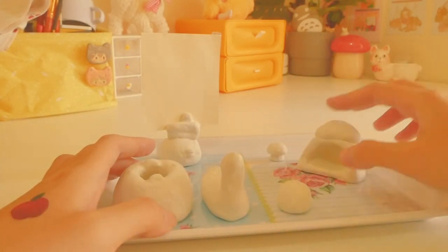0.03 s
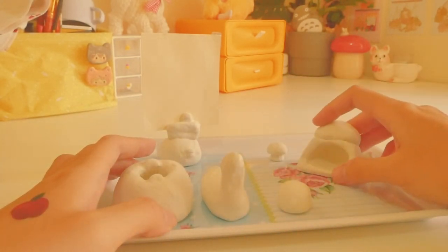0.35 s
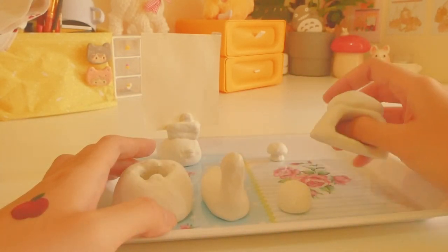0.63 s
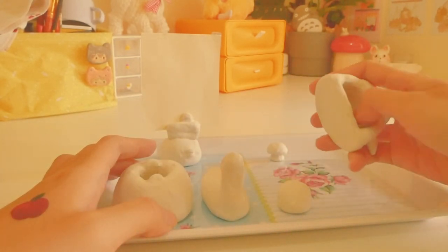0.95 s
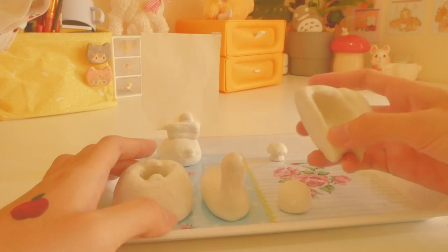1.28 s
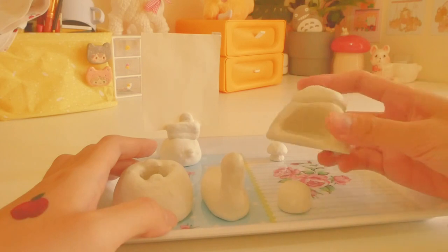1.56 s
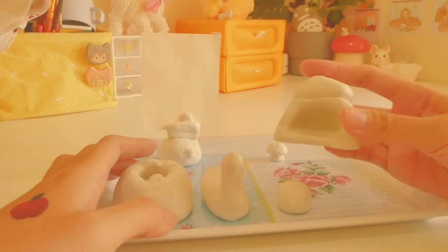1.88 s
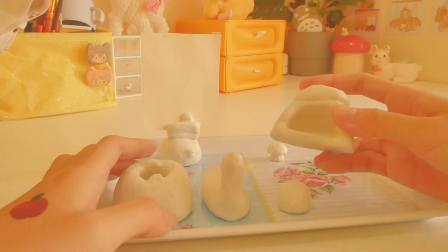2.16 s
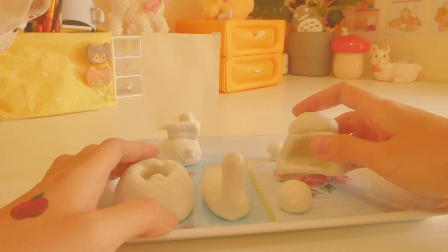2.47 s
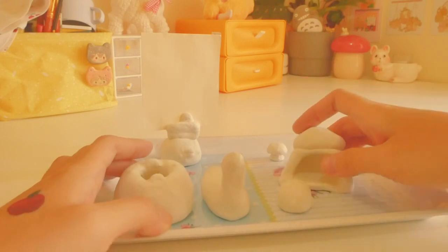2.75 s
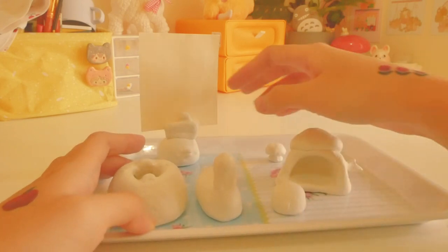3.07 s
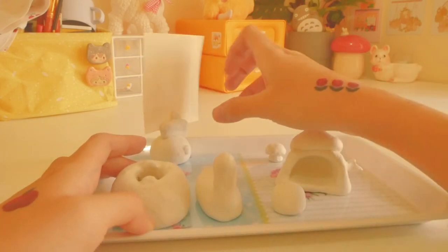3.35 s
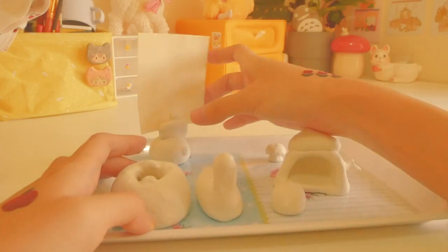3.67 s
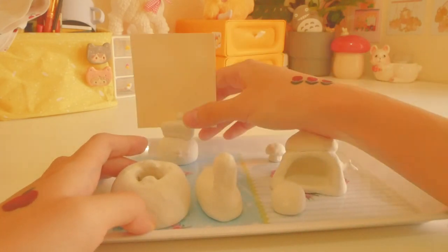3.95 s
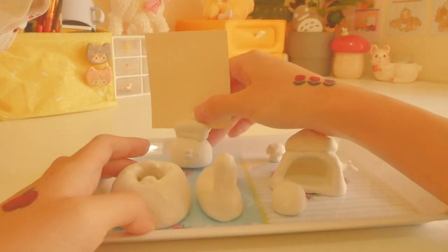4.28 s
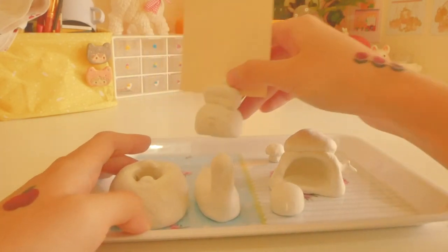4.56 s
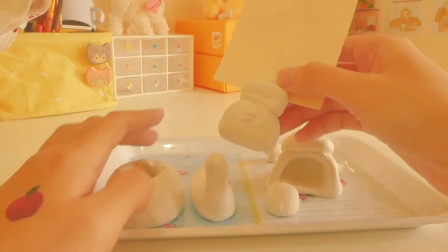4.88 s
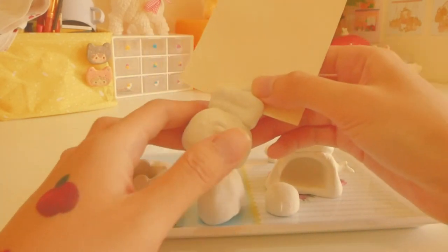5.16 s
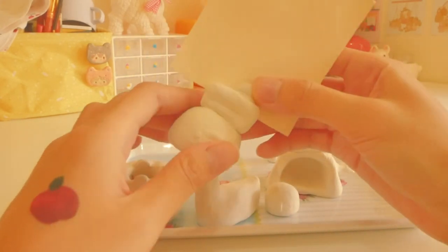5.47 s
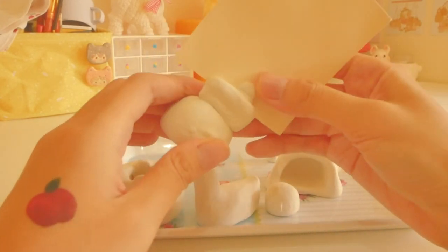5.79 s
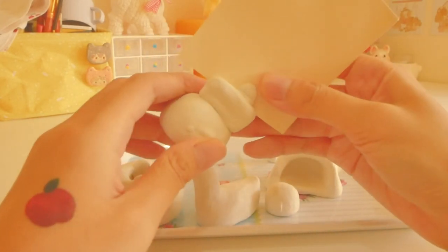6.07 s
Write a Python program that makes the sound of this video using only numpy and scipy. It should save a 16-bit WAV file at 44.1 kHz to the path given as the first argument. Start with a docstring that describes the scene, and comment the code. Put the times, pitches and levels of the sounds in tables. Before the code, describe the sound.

Small clay figures are handled close by on a plastic tray in a quiet, slightly reverberant room. Soft bumps and a light knock come in the first half second, followed by very faint finger rubbing. At 2.7 and 2.8 seconds a figure is set down with two hollow, dry clacks. From 3.4 seconds another is bumped and rocks in a quick run of taps, with the loudest knock near 3.9. Light ticks follow, and the tray groans faintly under dragging clay around 3.8 and 4.4. A paper card rustles softly, with occasional faint hisses of sliding skin. Several sharp clacks fall between 5.1 and 5.4 seconds, then fingers rub clay and paper until about 6.3. Underneath, a low room hush rises slightly, and a thin, faint electric whirr appears at the start, from 4 to 5 seconds and at the very end.

```python
"""On a desk in a quiet room, small clay figures are picked up, set down and bumped on a plastic tray.
Each impact excites damped modes of tray and desk, a hollow thump, while the chattering contact radiates
a dry clack and a bright snap. A bumped figure rocks from edge to edge; a dragged one makes the tray groan.
Fingers rub clay and a paper card with stick-slip friction; faint narrow hisses and squeaks pass now and
then. The room reverberates briefly, over an on-and-off electric whirr and a low, slowly rising hush."""
import sys
import numpy as np
from scipy import signal
from scipy.fft import rfft, irfft, next_fast_len
from scipy.io import wavfile
from scipy.ndimage import map_coordinates

SR = 44100
rng = np.random.default_rng(int(sys.argv[2]) if len(sys.argv) > 2 else 0)


def unload_audio(sound):
    """Save the sound as a 16-bit wav file, at the path given as the first command line argument."""
    columns = np.transpose(np.atleast_2d(sound))
    # keep every value between -1 and 1, then stretch to whole-number steps
    steps = np.round(np.clip(columns, -1, 1) * 32767)
    wavfile.write(sys.argv[1], SR, steps.astype(np.int16))


N = 279153
RING_TIME = np.arange(int(.7 * SR)) / SR  # time axis of one contact [s]

# hard knocks of clay on the tray: (time [s], thump [dB], clack [dB], bending [dB], snap [dB], desk [dB],
# thump centre [Hz], bending centre [Hz], desk centre [Hz], settling delay [s], settling gain [dB],
# chatter t60 [s], room gain of the clack [dB])
HARD_KNOCKS = [ (0.4756, -43.5, -44.5, -44.5, -58.5, -76, 340, 1900, 140, 0.0044, -2, 0.027, -6.5),
               (2.669, -34, -44.5, -41.5, -54, -62, 410, 1640, 167, 0.0032, 5, 0.027, -3),
               (2.8249, -33, -31, -31, -37, -57.5, 646, 1820, 140, 0.012, -3.5, 0.037, -3.5),
               (3.3582, -36, -34, -44, -41.5, -60.5, 303, 2200, 220, 0.0034, 3, 0.034, -5.5),
               (3.4331, -43.5, -45, -44, -55.5, -70, 500, 1300, 210, 0.002, -3.5, 0.023, -8),
               (3.8518, -25.5, -32.5, -35, -41.5, -60, 273, 835, 181, .008, -4, 0.068, -4),
               (3.866, -32.5, -39, -36.5, -45, -72, 360, 2220, 170, .004, -17, 0.016, -13),
               (3.879, -47, -38, -40.5, -46, -72, 350, 2220, 170, .003, -2.5, 0.015, -4),
               (4.249, -45.5, -46.5, -47, -61, -67, 307, 2160, 200, 0.002, -20, 0.022, -8),
               (5.119, -48, -41.5, -43, -45.5, -71.5, 326, 990, 169, 0.0042, -7.5, .014, -8),
               (5.3012, -45, -40, -36.5, -42, -56, 300, 600, 130, 0.0033, -3, 0.017, -3),
               (5.324, -35.5, -32, -34, -35, -66, 467, 1740, 120, 0.0069, -0.5, 0.028, -7),
               (5.434, -42.5, -38, -41.5, -41.5, -65.5, 323, 1670, 133, .0045, -8, 0.014, -6)]
# soft bumps of a pushed, rocking figure: (time [s], thump level [dB], thump centre [Hz])
SOFT_BUMPS = [(.228, -59.5, 346), (.333, -59, 115), (3.388, -36, 375), (3.481, -42.5, 370),
              (3.51, -49, 430), (3.5531, -48, 298), (3.6161, -53.5, 301), (3.6801, -53, 380),
              (3.7362, -44.5, 513), (3.751, -53, 337), (3.802, -48.5, 420), (3.921, -44, 473),
              (4.045, -47.5, 230), (4.1469, -53.5, 343), (5.262, -49.5, 130)]
# ticks of a fingernail or the card's edge: (time [s], clack level [dB], chatter t60 [s])
LIGHT_TICKS = [(0.3234, -57, 0.022), (1.097, -70, 0.044), (3.736, -60.5, 0.025), (4.031, -66, 0.017),
               (4.069, -60.5, .05), (4.111, -61, 0.011), (4.15, -66, 0.016), (4.236, -64, .012)]
# hollow modes of the tray: (frequency [Hz], relative level [dB], t60 [s])
HOLLOW_MODES = [(88, -20, 0.082), (145.5, -13.5, 0.22), (215, -6, 0.053), (268, -5, 0.038),
                (349.3, 2, 0.069), (388.5, -2, 0.045), (466, -1, 0.04), (546.3, -3, 0.064)]
# stiffer bending modes of the tray: (frequency [Hz], relative level [dB], t60 [s])
BENDING_MODES = [(577, -9.5, 0.13), (735, 6, 0.02), (913, 1.5, 0.044), (1261, -7, 0.063), (1388, -8, .13),
                 (1590, -7, 0.087), (1808, 3, 0.021), (2107, -1, 0.056), (2225, -6, 0.074),
                 (2540, -15, 0.028), (2840, -7, 0.047), (3220, 1.5, 0.023), (4740, 2, 0.04),
                 (7350, 8, 0.031)]
# booming modes of the desk: (frequency [Hz], relative level [dB], t60 [s])
DESK_MODES = [(97, -2.5, 0.28), (150, 1.5, 0.48), (200.5, -3, 0.62), (236, -2, 0.72), (279.4, 1.5, 0.58),
              (350, 4.5, 0.34), (437, -2, 0.38)]
# spectrum of the dry clack: (frequency [Hz], relative level [dB])
CLACK_SPECTRUM = [(250, -50.5), (550, -3), (880, 0), (1150, -3.5), (1800, -2.5), (2400, 0), (3200, -4.5),
                  (4300, -9), (6200, -28), (12000, -74)]
# spectrum of the bright snap: (frequency [Hz], relative level [dB])
SNAP_SPECTRUM = [(2000, -36), (3500, 4.5), (4400, 2), (6500, -1), (7800, -8), (11000, -5), (13000, -16),
                 (16000, -38)]
# groans of the tray under a dragged figure: (peak time [s], level [dB], length [s], pitch [Hz])
DRAG_GROANS = [(3.777, -59.5, 0.15, 201), (4.394, -59, 0.26, 198.4)]
# finger strokes on clay and paper: (peak time [s], level [dB], length [s])
FINGER_STROKES = [(0.534, -68, 0.18), (0.595, -67.5, 0.047), (0.994, -79.5, 0.25), (1.389, -76.5, 0.055),
                  (2.418, -70, 0.07), (2.48, -74, 0.082), (3.022, -66, 0.17), (3.301, -63, 0.15),
                  (3.351, -54.5, 0.042), (3.727, -64.5, 0.05), (3.8, -68, 0.075), (4.0, -63, 0.15),
                  (4.157, -64.5, .07), (4.24, -61.5, 0.11), (4.342, -65, 0.15), (4.7, -68, 0.23),
                  (5.093, -74, .08), (5.661, -59, 0.03), (5.828, -60.5, 0.084), (5.878, -64, 0.047),
                  (6.042, -60.5, 0.088), (6.179, -64, 0.068), (6.28, -64.5, 0.11)]
# rustle of the card as it is taken up and held: (time [s], level [dB])
CARD_RUSTLE = [(3.65, -77), (4.15, -72.5)]
# spectrum of the rubbing: (frequency [Hz], relative level [dB])
RUB_SPECTRUM = [(600, -1), (2000, 1), (3800, -4), (6000, -4), (8000, -8), (11500, -5.5), (14000, -16),
                (16000, -38)]
# faint narrow hisses and squeaks, like a soft sniff or sliding skin:
# (peak time [s], level [dB], length [s], pitch [Hz], resonance width [Hz])
NARROW_HISSES = [(.36, -81, .09, 4720, 250), (1.208, -81, .12, 3980, 160), (1.698, -67, 0.055, 1080, 40),
                 (3.028, -61.5, 0.15, 3450, 900), (4.696, -65, 0.23, 3560, 342)]
# reflections from the desk and the toys behind the tray: (delay [s], gain [dB])
REFLECTIONS = [(.0021, -36), (.0046, -19.5), (.0069, -12)]
# reverberation time of the room: (frequency [Hz], t60 [s])
ROOM_DECAY = [(100, .48), (260, .36), (700, .37), (1900, .37), (5000, .3), (12000, .21)]
# stereo balance at full lean: (frequency [Hz], left minus right [dB])
BALANCE = [(80, -3), (200, -6.5), (500, -2.5), (1400, -0.5), (4000, -0.5)]
# spells of electric whirr: (start [s], end [s], level [dB])
WHIRR_SPELLS = [(-.15, .8, -71), (3.9, 5.05, -68), (6.2, 7.7, -68)]
# spectrum of the hush: (frequency [Hz], relative level [dB])
HUSH_SPECTRUM = [(25, -3), (60, -19.5), (120, -14), (200, -1), (260, 0.5), (590, -7.5), (750, -5.5),
                 (1030, -4), (1400, -14.5), (1960, -9.5), (3100, -20.5), (8000, -32.5), (11500, -33.5),
                 (14000, -64)]
# stereo width of the hush: (frequency [Hz], side minus mid [dB])
HUSH_WIDTH = [(40, 11.5), (200, 1.5), (550, 5), (1400, -1), (3500, -1), (9000, -8.5)]
# slow rise of the hush: (time [s], level [dB])
HUSH_RISE = [(2.6, -66), (4.6, -61)]


def contacts(rebound_ratio=.75, rebound_loss_db=9.5):
    """Impact excitation: hard knocks are bright, soft bumps mostly thump, ticks only clack and snap."""
    out = np.zeros((2, N))
    for (s, thump_db, clack_db, bend_db, snap_db, desk_db, thump_hz, bend_hz, desk_hz,
         settle_s, settle_db, t60, room_db) in HARD_KNOCKS:
        add(out, s, tray_ring(thump_db, bend_db, desk_db, thump_hz, bend_hz, desk_hz))
        # an edge lands, the base follows and rebounds once
        rebound = settle_s * (1 + rebound_ratio), settle_db - rebound_loss_db
        for delay, db in (0, 0), (settle_s, settle_db), rebound:
            add(out, s + delay, clack_and_snap(clack_db + db, snap_db + db, t60, room_db))
    for s, db, hz in SOFT_BUMPS:
        add(out, s, tray_ring(db, bend_db=db - 14.5, desk_db=db - 22,
                              thump_hz=hz, bend_hz=895, desk_hz=206))
        add(out, s, clack_and_snap(clack_db=db - 11.5, snap_db=db - 26, t60=.053))
    for s, db, t60 in LIGHT_TICKS:
        add(out, s, clack_and_snap(clack_db=db, snap_db=db - 1.5, t60=t60))
    return out


def tray_ring(thump_db, bend_db, desk_db, thump_hz, bend_hz, desk_hz):
    """Free vibration: a blow rings the tray at once; the desk takes it up slowly and hums on."""
    thump = amp(thump_db) * ring(HOLLOW_MODES, thump_hz, focus_db=8, vary_db=1.5, detune=.008, rise_s=.002)
    bend = amp(bend_db) * ring(BENDING_MODES, bend_hz, focus_db=6, vary_db=2.5, detune=.004, rise_s=.0003)
    boom = amp(desk_db) * ring(DESK_MODES, desk_hz, focus_db=7, vary_db=1.5, detune=.004, rise_s=.015)
    tail = reverberation(amp(-10) * thump + amp(-7) * bend, width=.44, build_s=.0058)
    return thump + bend + boom + tail


def ring(modes, centre_hz, focus_db, vary_db, detune, rise_s):
    """Modal superposition: damped sines add, and the spot struck favours those near one pitch."""
    hz, db, t60 = np.transpose(modes)[:, :, None]
    db = db - focus_db * np.log2(hz / centre_hz) ** 2
    # the place of the blow and the weight of the clay vary each mode's strength and pitch
    strength, shift, polarity = rng.standard_normal((3,) + hz.shape)
    decay = amp(db + vary_db * strength - 60 * RING_TIME / t60)
    waves = np.sign(polarity) * decay * np.sin(2 * np.pi * hz * (1 + detune * shift) * RING_TIME)
    return unit_onset(waves.sum(0) * (1 - np.exp(-RING_TIME / rise_s)))


def clack_and_snap(clack_db, snap_db, t60, clack_room_db=-5, snap_room_db=-5.5, snap_width=.14):
    """Transient radiation: a brief contact sends a broadband clack and snap into the room."""
    clack_pulse, snap_pulse = minimum_phase(CLACK_SPECTRUM), minimum_phase(SNAP_SPECTRUM)
    clack = amp(clack_db) * early_reflections(chatter(clack_pulse, t60, first=1.5, uneven_db=10))
    snap = amp(snap_db) * chatter(snap_pulse, t60, first=3.5, uneven_db=4.5)
    # the snap scatters off the hand, a little differently to each side
    scatter = amp(snap_db) * chatter(snap_pulse, t60, first=0, uneven_db=3)
    to_room = amp(clack_room_db) * diffused(clack, clack_pulse)
    to_room += amp(snap_room_db) * diffused(snap, snap_pulse)
    return stereo(clack + snap, scatter, snap_width) + reverberation(to_room, width=.29, build_s=.00022)


def chatter(pulse, t60, first, uneven_db):
    """Convolution: a first touch and a dying train of tiny uneven contacts each radiate the same pulse."""
    force, size = rng.standard_normal((2, len(RING_TIME)))
    force = unit(force * amp(uneven_db * size)) * amp(-60 * RING_TIME / t60)
    force[0] = first
    return unit_onset(signal.fftconvolve(force, pulse)[:len(RING_TIME)])


def groans(wander_rad=.5, wander_per_s=25):
    """Friction-driven vibration: a dragged figure keeps one low note of the tray humming unsteadily."""
    t = np.arange(N) / SR
    note = lambda hz: unit(np.sin(2 * np.pi * hz * t + wander_rad * wobble(wander_per_s)))
    return sum(amp(db) * swell(s, length) * note(hz) for s, db, length, hz in DRAG_GROANS)


def fingers(flicker, crackle_db=-6.5):
    """Stick-slip friction: skin catches on clay and paper in spurts of grainy, crackling hiss."""
    colour = lambda hz: amp(along(RUB_SPECTRUM, hz))
    pressure = sum(amp(db) * swell(s, length) for s, db, length in FINGER_STROKES)
    held = amp(curve(CARD_RUSTLE)) * (np.arange(N) / SR > CARD_RUSTLE[0][0])
    texture = grainy_noise(flicker, colour) + amp(crackle_db) * unit(filtered(crackles(), colour))
    return np.hypot(pressure, held) * stereo(*texture, width=.16)


def crackles(per_s=130):
    """Poisson process: single fibres snag and let go at random moments, with uneven force."""
    return (rng.random(N) < per_s / SR) * rng.standard_normal(N)


def narrow_hisses(flicker, upper_ratio=1.26, upper_db=-7):
    """Resonance: two peaks narrow noise to a faint hiss or squeak, like a soft sniff or sliding skin."""
    out = np.zeros((2, N))
    for s, db, length, pitch_hz, width_hz in NARROW_HISSES:
        peak = lambda offset_hz: 1 / (1 + (2 * offset_hz / width_hz) ** 2)
        pair = lambda hz: peak(hz - pitch_hz) + amp(upper_db) * peak(hz - upper_ratio * pitch_hz)
        out += amp(db) * swell(s, length) * grainy_noise(flicker, pair)
    return stereo(*out, width=.16)


def grainy_noise(flicker, response):
    """Source and filter: flickering noise, mid and side, takes the colour of a response."""
    return unit(filtered(flicker * rng.standard_normal((2, N)), response))


def swell(peak_s, length, rise_share=.47, edge_db=14.5):
    """Gaussian envelope: a sound builds to a peak and dies away."""
    offset = (np.arange(N) / SR - peak_s) / length
    distance = np.maximum(-offset / rise_share, offset / (1 - rise_share))
    return amp(-edge_db * np.minimum(distance ** 2, 20))


def early_reflections(x):
    """Comb filtering: delayed copies from nearby surfaces ripple the spectrum."""
    echoes = sum(amp(db) * np.pad(x, (round(s * SR), 0))[:len(x)] for s, db in REFLECTIONS)
    return unit_onset(x + echoes)


def diffused(x, pulse):
    """Spatial averaging: over all directions a contact keeps its energy and colour but loses its ripple."""
    return np.pad(pulse, (0, len(x) - len(pulse))) * np.linalg.norm(x) / np.linalg.norm(pulse)


def reverberation(x, width, build_s):
    """Diffuse field: a tail builds up and dies faster in the treble, nearly alike at both ears."""
    n = len(RING_TIME)
    hz, t, noise = signal.stft(rng.standard_normal((2, n)), SR, nperseg=256)
    decay = amp(-60 * t / along(ROOM_DECAY, hz)[:, None])
    mid, side = signal.istft(noise * decay, SR, nperseg=256)[1][:, :n]
    tail = stereo(mid, side, width) * (1 - np.exp(-RING_TIME / build_s)) ** 2
    return signal.fftconvolve(x[None], tail / np.linalg.norm(tail[0]), axes=1)[:, :n]


def whirr(centre_hz=2350, half_band_hz=135, mains_hz=50, fade_s=.15, pan_db=3):
    """Amplitude modulation: narrow noise swells once each mains cycle, a thin buzz off to the left."""
    t = np.arange(N) / SR
    band = lambda hz: 1 / (1 + ((hz - centre_hz) / half_band_hz) ** 4)
    bursts = .4 + np.cos(np.pi * mains_hz * t) ** 6
    mid, side = unit(filtered(rng.standard_normal((2, N)), band) * bursts)
    running = sum(amp(db) * np.clip(np.minimum(t - on, off - t) / fade_s, 0, 1)
                  for on, off, db in WHIRR_SPELLS)
    return running * stereo(mid, side, width=.29) * amp([[pan_db], [-pan_db]])


def hush():
    """Partial coherence: soft room noise is wide in the bass and narrower in the treble."""
    mid, side = unit(filtered(rng.standard_normal((2, N)), lambda hz: amp(along(HUSH_SPECTRUM, hz))))
    side = filtered(side, lambda hz: amp(along(HUSH_WIDTH, hz)))
    return amp(curve(HUSH_RISE)) * lean_right(stereo(mid, side, width=1), share=.55)


def lean_right(x, share):
    """Interaural level difference: low notes are louder on the right."""
    return filtered(x, lambda hz: amp(share * along(BALANCE, hz) * np.array([[.5], [-.5]])))


def stereo(mid, side, width):
    """Sum and difference give left and right."""
    return np.array([mid + width * side, mid - width * side])


def amp(db):
    """Decibel law: level to amplitude ratio."""
    return 10 ** (np.asarray(db) / 20)


def unit(x):
    """Normalisation to rms 1."""
    return x / np.sqrt(np.mean(x ** 2) + 1e-20)


def unit_onset(x, onset_s=.008):
    """Normalisation to rms 1 over the onset."""
    return x / np.sqrt(np.mean(x[:int(onset_s * SR)] ** 2) + 1e-20)


def along(points, hz):
    """Interpolation on a logarithmic frequency axis."""
    knots_hz, values = np.transpose(points)
    return np.interp(np.log(hz + 1), np.log(knots_hz), values)


def curve(points):
    """Linear interpolation in time, at every sample."""
    return np.interp(np.arange(N) / SR, *np.transpose(points))


def wobble(knots_per_s):
    """Random fluctuation: straight lines join Gaussian values."""
    return map_coordinates(rng.standard_normal(N), [np.arange(N) * knots_per_s / SR], order=1)


def filtered(x, response):
    """Linear filtering: the spectrum is multiplied by a frequency response."""
    n = x.shape[-1]
    size = next_fast_len(n + 8192)
    return irfft(rfft(x, size) * response(np.fft.rfftfreq(size, 1 / SR)), size)[..., :n]


def minimum_phase(spectrum, size=1024):
    """Minimum phase: folding the cepstrum gives the most compact causal pulse with this spectrum."""
    gain = amp(along(spectrum, np.fft.rfftfreq(size, 1 / SR)))
    cepstrum = irfft(np.log(gain))
    cepstrum[1:size // 2] *= 2
    cepstrum[size // 2 + 1:] = 0
    return irfft(np.exp(rfft(cepstrum)))


def add(out, s, sound):
    """Superposition: a sound joins the mix at time s."""
    start = round(s * SR)
    out[:, start:start + len(RING_TIME)] += sound[:, :N - start]


def scene():
    """Superposition of sources: tray and hands close by, the room behind them."""
    tray = lean_right(contacts() + groans(), share=1)
    flicker = unit(amp(-1.5 * wobble(400) + 2.5 * wobble(60)))  # fine grain and slower spurts
    return tray + fingers(flicker) + narrow_hisses(flicker) + whirr() + hush()


def record(dry, bass_hz=75, top_hz=15600):
    """Band limiting: the microphone thins the deep bass and cuts off the highest treble."""
    thin = signal.sosfilt(signal.butter(2, bass_hz, "high", fs=SR, output="sos"), dry)
    return filtered(thin, lambda hz: 1 / (1 + (hz / top_hz) ** 80))


dry = scene()
out = record(dry)
unload_audio(out)
```